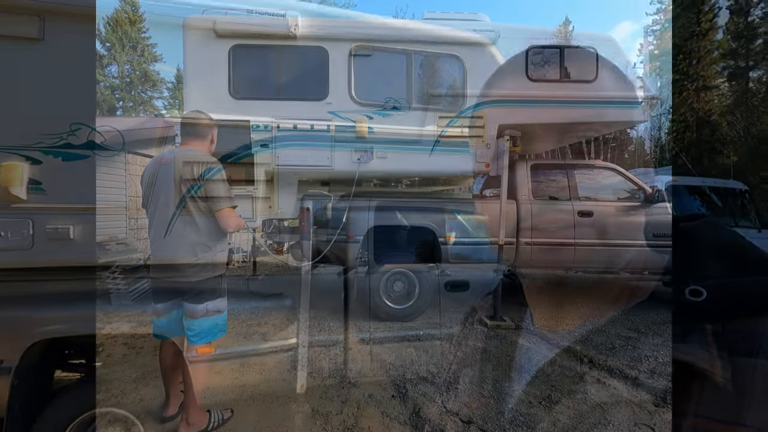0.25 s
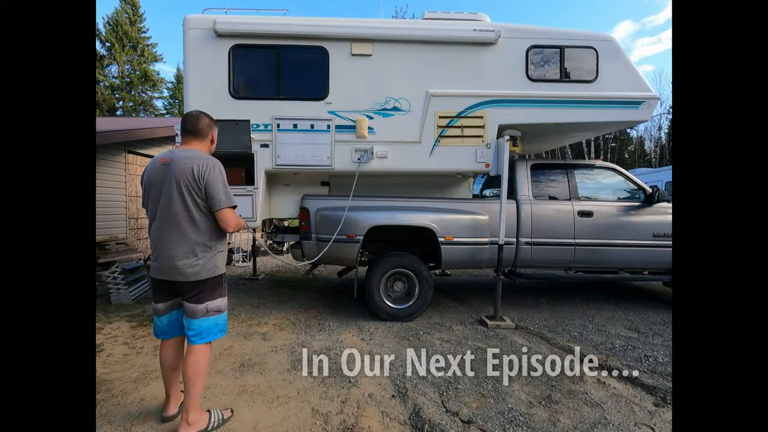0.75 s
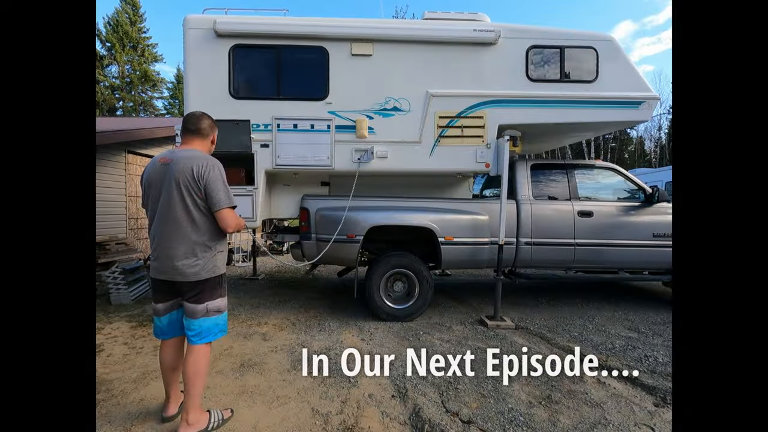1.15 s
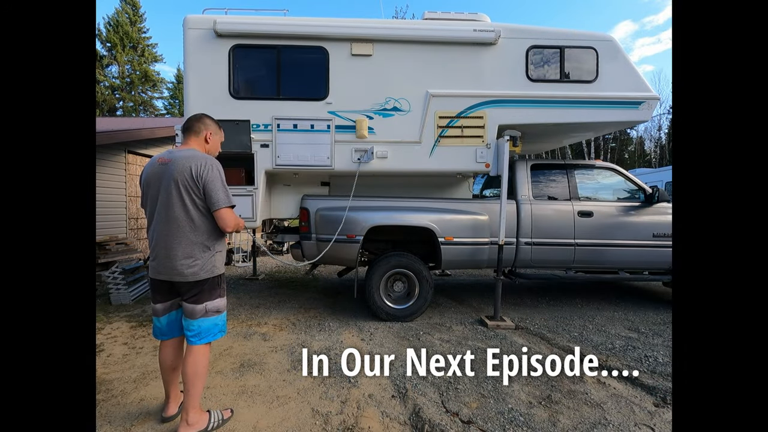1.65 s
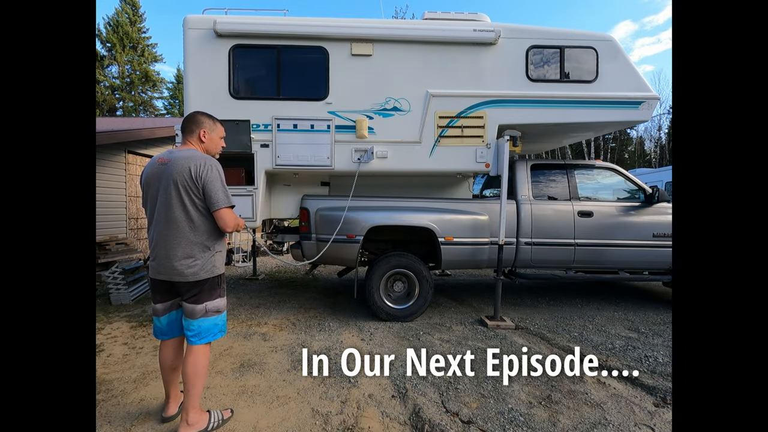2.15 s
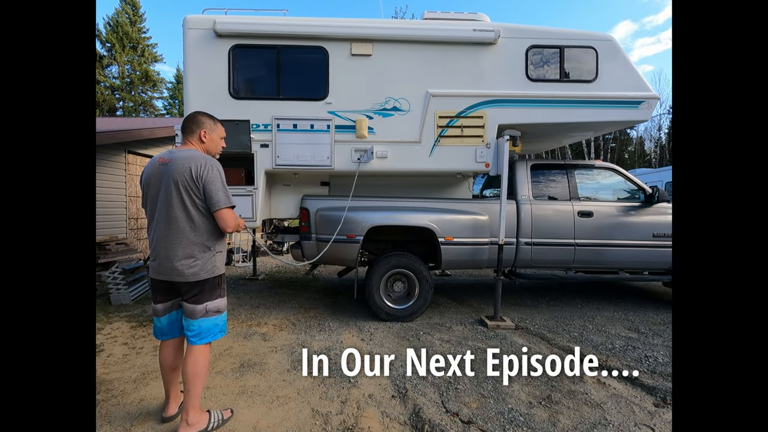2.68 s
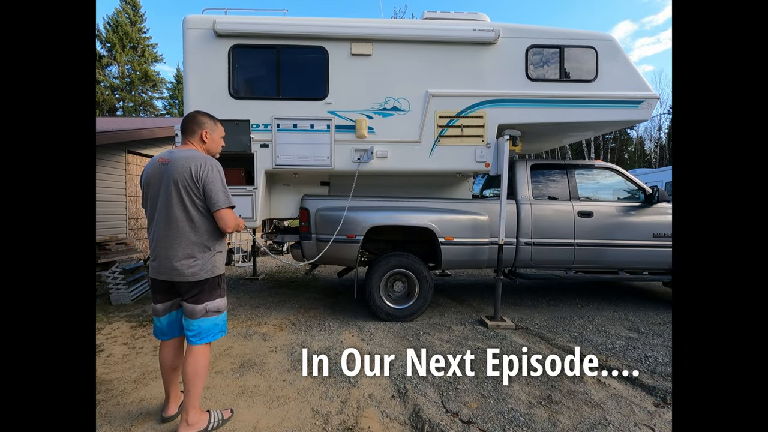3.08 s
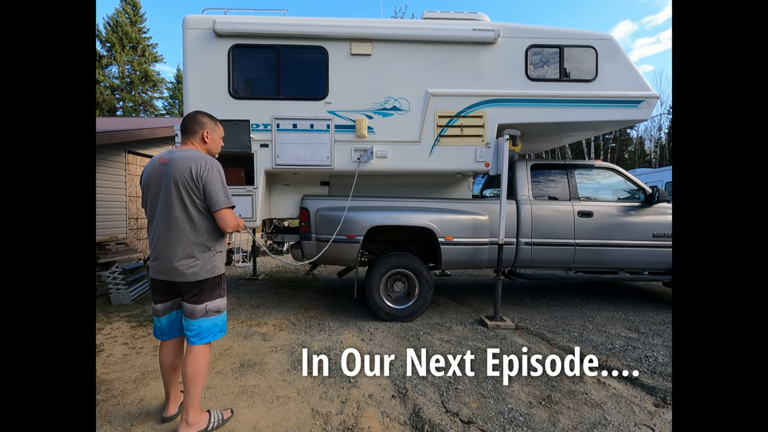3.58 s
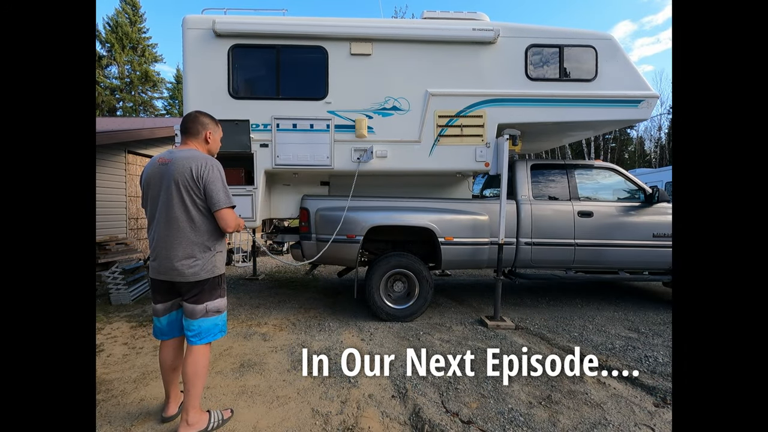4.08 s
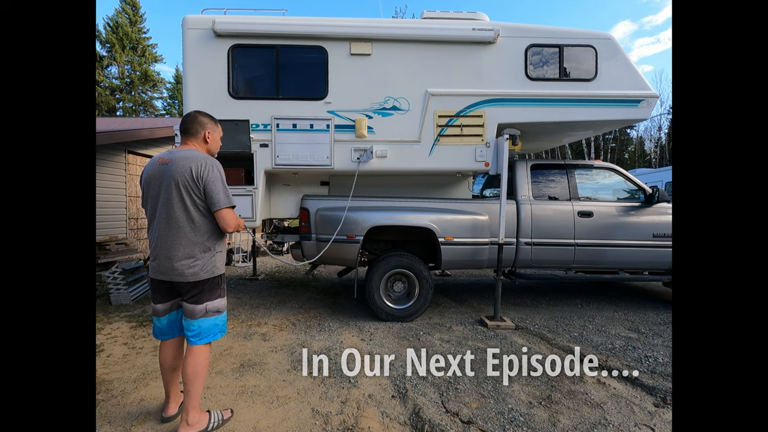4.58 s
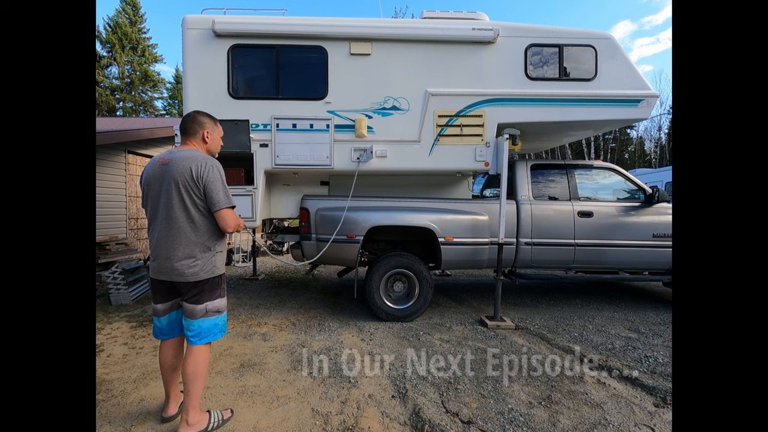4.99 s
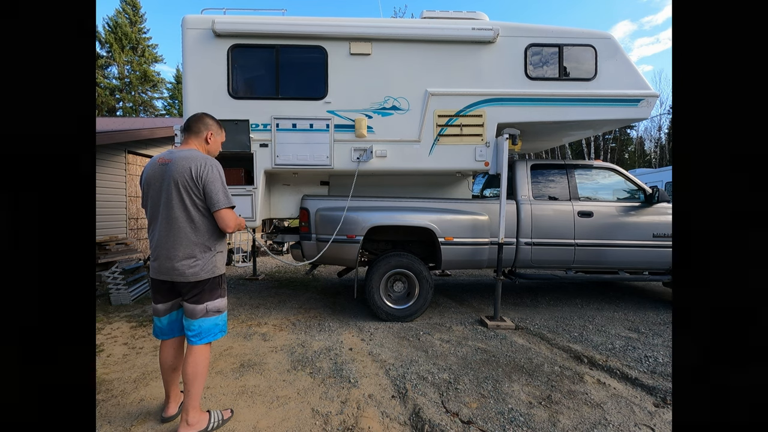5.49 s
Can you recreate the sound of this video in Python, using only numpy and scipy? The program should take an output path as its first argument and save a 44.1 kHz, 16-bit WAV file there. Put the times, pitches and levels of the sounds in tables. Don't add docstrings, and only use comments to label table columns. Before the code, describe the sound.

A quiet outdoor yard with low distant air, faint traffic-like rumble and a brief leaf stir at the start. At about 0.15 s a dry double switch click sounds, and a faint motor noise rises before cutting in fully near 0.28 s: a rough, resonant, buzzing electric gear motor. It drops out around 1.02 s with hollow knocks and a very short low run-down to 1.14 s. Soft wind gusts fill the pause, strongest near 1.2, 1.8 and 2.07 s. Around 2.07-2.18 s relay clicks and a clunk accompany a second motor spinning up quickly. It settles into a steady mid-pitched whine near 650 Hz with a higher octave, metallic rattle and fine hiss, throbbing several times a second and wavering slightly. A faint low frame hum swells and fades. At about 5.46 s power cuts; the pitch falls sharply, two solid knocks land near 5.5 s, and short dull echoes fade into yard air.

```python
import sys
import numpy as np
from scipy import signal
from scipy.fft import rfft, irfft
from scipy.io import wavfile
from scipy.ndimage import uniform_filter1d

SR = 44100
rng = np.random.default_rng(int(sys.argv[2]) if len(sys.argv) > 2 else 0)


def log_audio(samples):
    frames = np.atleast_2d(samples).T
    limited = np.clip(frames, -1, 1)
    pcm = np.round(limited * 32767).astype(np.int16)
    wavfile.write(sys.argv[1], SR, pcm)


def level_to_linear(level):
    exponent = np.asarray(level, float) / 20
    return 10 ** exponent


N = 252867
T = np.arange(N) / SR

# f/Hz, level/dB per Hz
YARD_SPECTRUM = [(15, -49), (25, -15), (93, -18.5), (141, -18.5), (176, -7.5), (214, -10), (348, -7.5),
                 (444, -4.5), (567, -5), (924, -14.5), (1540, -16.5), (1660, -18.5), (6660, -41),
                 (8500, -56), (11000, -89), (18700, -120)]
# t/s, width/s, wind lift/dB, leaf lift/dB
GUSTS = [
    (.07, 0.081, 0, 5),
    (1.2, 0.16, 5, 2),
    (1.78, 0.05, 9, 1),
    (2.07, 0.033, 7, 2),
]
YARD_LEVEL_DB, WIND_DB, CALM_DB, RUSTLE_DB = -44, 1, -4, 1
ECHO_T60_S, ECHO_DB = 0.25, -14.5

# start t/s, peak t/s, end t/s, level/dB
HUM_SWELLS = [
    (2.53, 2.9, 3.46, -57),
    (3.5, 3.98, 4.4, -56),
    (4.37, 4.47, 4.62, -62),
    (4.68, 4.85, 5.2, -60),
    (4.9, 5.47, 5.71, -53),
]

# t/s, peak level/dB,
# f/Hz, t60/s, noise share (0-1)
CLICKS = [(.1511, -27.5, 1520, 0.0086, 0.37), (.1511, -34, 3000, .006, 0.34),
          (0.1548, -26, 1630, 0.01, 0.47), (0.1552, -36, 3600, .006, 0.38), (.1705, -40, 500, .01, 0),
          (1.022, -24.5, 583, 0.098, 0.3), (1.056, -36, 700, .12, .3), (1.064, -31.5, 870, 0.14, 0.55),
          (1.092, -31, 500, .11, 0.19), (2.0658, -37.5, 2600, .025, 1), (2.108, -25, 587, 0.23, 0.17),
          (2.094, -61, 11100, 0.008, 1), (2.175, -43, 11000, .05, 0.65), (2.178, -30.5, 6240, 0.034, 1),
          (5.482, -23, 590, 0.065, 0), (5.5, -19.5, 684, 0.086, 0.16), (5.497, -26, 2170, .09, 0.2)]

# order (times shaft rate), level/dB
BUZZ_ORDERS = [(1, -64), (2.6, -59), (4, -57), (5, -53), (7.6, -51), (8, -47), (9, -47), (10, -50),
               (11, -40), (12, -51), (13.8, -51), (15, -49), (19, -54), (21, -52), (22, -47), (23, -52),
               (25, -41), (28, -47), (29, -48), (30, -48), (31, -43), (32, -48), (39, -50), (41, -43),
               (43, -54), (45, -48), (50, -52), (51, -48), (60, -52), (65, -51)]
# f/Hz, level/dB per Hz
BUZZ_BODY = [(24, -55), (40, -32), (288, -15.5), (350, -18), (643, -5.5), (744, -15), (949, -12),
             (1440, -10.5), (2120, -15.5), (2340, -14), (3900, -16.5), (7170, -37.5), (11400, -57),
             (13500, -68)]
# f/Hz, width/Hz, lift/dB
BUZZ_MODES = [(530, 220, 0.5), (1240, 140, 4.5), (1727, 100, 7), (2330, 94, 8), (2525, 47, 15),
              (2840, 120, 7.5), (3380, 80, -12), (3600, 80, -0.5), (4640, 77, 3), (7080, 230, 5.5),
              (2240, 160, 0), (3300, 130, 0.5)]
BUZZ_HZ, BUZZ_SAG_HZ_S, BUZZ_COAST_HZ_S = 58.3, .3, 160
FAINT_FROM_S, FAINT_DB, FAINT_RISE_DB_S = 0.23, -54, 152
LOUD_FROM_S, BUZZ_OFF_S, BUZZ_STOP_S = .283, 1.015, 1.137
BUZZ_DB, BUZZ_LOW_DB = -32.5, -35
BUZZ_DROP_S, BUZZ_DROP_DB_S = 1.0334, 800
BUZZ_TAIL_DB, BUZZ_TAIL_DB_S, BUZZ_LOW_TAIL_DB = -15, 116, -1.5

# order (times shaft rate), level/dB, throb depth at the wheel rate
WHINE_ORDERS = [(2, -61, 0), (3, -64, .2), (3.8, -55, 0), (5, -53, 0), (8, -52, -.2), (9, -48, -.2),
                (11, -50, -.2), (12, -50, 0), (15, -52, -.5), (16.2, -52, 0), (22, -54, .4), (25, -51, .3),
                (26, -56, .4), (29, -51, .3), (30, -42.5, .75), (33, -52, .4), (40, -48, .6), (45, -53, .3),
                (50, -57, .3), (60, -61, .3), (87, -64, .3), (95, -60, .3)]
# f/Hz, level/dB per Hz
WHINE_BODY = [(24, -68), (40, -44.5), (405, -24.5), (593, -13.5), (664, -6.5), (850, -24), (1220, -20.5),
              (1330, -12), (1420, -20), (2000, -15.5), (4900, -25.5), (6140, -23.5), (8600, -49),
              (11200, -106), (18900, -120)]
# f/Hz, width/Hz, lift/dB
WHINE_MODES = [(503, 53, 3.5), (590, 520, 3), (978, 180, 6), (1540, 99, 4), (1942, 104, 1.5),
               (2190, 170, 5), (2720, 290, 2.5), (2928, 127, 6), (3504, 126, 6), (3770, 52, 3.5),
               (6156, 102, 9), (5720, 150, 5.5)]
# f/Hz, level/dB per Hz
TOOTH_HISS = [(3820, -26), (6500, -15.5), (6680, -9.5), (8090, -12), (8960, -18.5), (10900, -10.5),
              (12900, -23.5), (13600, -42)]
# f/Hz, level/dB
MESH_RESPONSE = [(310, -55), (430, -41), (540, -35), (578, -21), (600, -24.5), (639, -21.5), (648, -25),
                 (670, -26.5)]
# f/Hz, level/dB
OCTAVE_RESPONSE = [(500, -52), (625, -29.5), (810, -23.5), (1110, -46.5), (1190, -38), (1260, -37.5),
                   (1305, -40.5), (1338, -32.5)]
# times per screw turn, shaft speed change/Hz, lag/rad
SCREW_DRAG = [(1, .27, .03), (2, .57, .91), (4, .3, -.11)]
TEETH, GEAR_RATIO, GEAR_HIGH_SPOT_S = 10, .1189, 2.742
SCREW_TURN_S, SCREW_MARK_S = 1.705, 3.55
START_S, SPIN_HZ_S, KNEE_S, SETTLE_S = 1.998, 285, 2.17, .09
FULL_HZ, SAG_HZ_S = 65.96, .08
POWER_OFF_S, COAST_S, COAST_HZ_S, CRAWL_HZ = 5.46, 5.468, 320, 38
RATTLE_DB, LOAD_DB_S, FULL_S, RISE_DB_S = -30.5, 0.25, 2.1395, 361
STOP_S, FALL_DB_S, REST_DB, REST_DB_S = 5.512, 516, -15, 97
HISS_DB, HISS_LOAD_DB_S, HISS_SPEED_DB = -31, 0.3, 22
MESH_WEAR_DB_S, MESH_SWELL_DB, MESH_LAG = -0.7, 1.15, 1.48
OCTAVE_SWELL_DB, OCTAVE_LAG = 0.9, 2.9
MESH_OFF_DB_S, OCTAVE_OFF_DB_S = 150, 600


def after(s):
    return np.maximum(T - s, 0)


def before(s):
    return np.maximum(s - T, 0)


def set_rms(x, db):
    return x * level_to_linear(db) / np.sqrt(np.mean(x ** 2))


def band(x, low_hz, high_hz):
    edges = [low_hz, min(high_hz, .45 * SR)]
    return signal.sosfilt(signal.butter(2, edges, "band", fs=SR, output="sos"), x)


def walk(rate):
    k = int(SR / rate)
    steps = np.repeat(rng.standard_normal(N // k + 1), k)
    return 1.3 * uniform_filter1d(uniform_filter1d(steps, k), k)[:N]


def lift_db(hz, modes):
    return sum(db / (1 + (2 * (hz - f) / w) ** 2) for f, w, db in modes)


def colour(x, spectrum, modes=()):
    size = 8192
    hz = np.maximum(np.arange(size // 2 + 1) * SR / size, 1)
    f, db = np.transpose(spectrum)
    gain_db = np.interp(np.log(hz), np.log(f), db) + lift_db(hz, modes)
    cepstrum = irfft(gain_db * np.log(10) / 20)
    cepstrum[1:size // 2] *= 2
    cepstrum[size // 2 + 1:] = 0
    return signal.fftconvolve(x, irfft(np.exp(rfft(cepstrum))))[:N]


def passed_db(hz, response):
    f, db = np.transpose(response)
    return np.interp(np.log(hz), np.log(f), db)


def yard():
    db = YARD_LEVEL_DB - 35 * before(0.11)
    gusts = sum(np.outer(lift, np.exp(-((T - s) / width) ** 2)) for s, width, *lift in GUSTS)
    wind_db = np.where(T < LOUD_FROM_S, CALM_DB, WIND_DB) + gusts[0]
    rustle_db = RUSTLE_DB + gusts[1]
    flicker = level_to_linear(.8 * walk(14))
    air = set_rms(colour(rng.standard_normal(N) * flicker, YARD_SPECTRUM), -7)
    wind = band(air, 15, 230) * (level_to_linear(wind_db + 1.5 * walk(7)) - 1)
    rustle = band(air, 900, 12000) * (level_to_linear(rustle_db) - 1)
    return (air + wind + rustle) * level_to_linear(db)


def frame():
    hz = np.where(T < COAST_S, whine_hz(), FULL_HZ + 1)
    size = sum(level_to_linear(db) * np.sin(np.interp(T, [start, peak, end], [0, np.pi / 2, np.pi]))
               for start, peak, end, db in HUM_SWELLS)
    return np.sqrt(2) * size * np.sin(2 * np.pi * np.cumsum(hz) / SR)


def clicks():
    out, t = np.zeros(N), T[:4096]
    for s, db, hz, t60, share in CLICKS:
        burst = set_rms(band(rng.standard_normal(len(t)), 0.5 * hz, 1.1 * hz), -1)
        ring = (1 - share) * np.sin(2 * np.pi * hz * t) + share * burst
        onset = np.minimum(t / (.5 / hz), 1)
        i = int(s * SR)
        out[i:i + len(t)] += level_to_linear(db) * ring * np.exp(-np.log(1000) * t / t60) * onset
    return out


def shaft_line(order, shaft_hz, turn, modes, flutter_db, slip, rate):
    grid = np.linspace(0, shaft_hz.max(), 500)
    lift = 0 * grid + lift_db(order * grid, modes)
    passing_db = np.interp(shaft_hz, grid, lift) - lift_db(order * grid[-1], modes)
    phase = order * turn + slip * walk(rate) + 2 * np.pi * rng.random()
    return np.sqrt(2) * level_to_linear(passing_db + flutter_db * walk(rate)) * np.sin(phase)


def grit(turn, beats, scatter_db, repeat):
    gate = sum(db * np.cos(order * turn) for order, db in beats)
    size = np.minimum(rng.exponential(size=N), 5)
    flaws = np.diff(rng.standard_normal(641))
    alike = flaws[(turn / (2 * np.pi) % 1 * len(flaws)).astype(int)]
    repeat = np.clip(repeat, 0, 1)
    loose = rng.standard_normal(N) * level_to_linear(scatter_db * (size - 0.5))
    return (np.sqrt(1 - repeat) * loose + np.sqrt(repeat) * alike) * level_to_linear(gate)


def buzz_db(hold_db, tail_db):
    faint = FAINT_DB - FAINT_RISE_DB_S * before(FAINT_FROM_S)
    off_s = after(BUZZ_DROP_S)
    coast = np.maximum(-BUZZ_DROP_DB_S * off_s, tail_db - BUZZ_TAIL_DB_S * off_s)
    return np.where(T < LOUD_FROM_S, faint, hold_db + coast - 900 * after(BUZZ_STOP_S))


def buzz():
    run_down_hz = np.minimum(BUZZ_COAST_HZ_S * after(BUZZ_OFF_S), 22)
    shaft_hz = BUZZ_HZ - BUZZ_SAG_HZ_S * after(LOUD_FROM_S) - run_down_hz
    turn = 2 * np.pi * np.cumsum(shaft_hz) / SR
    high_db = buzz_db(BUZZ_DB, BUZZ_TAIL_DB)
    low_db = buzz_db(BUZZ_LOW_DB, BUZZ_LOW_TAIL_DB)
    lines = sum(level_to_linear(db) * shaft_line(order, shaft_hz, turn, BUZZ_MODES, flutter_db=1.3, slip=.15, rate=9)
                for order, db in BUZZ_ORDERS)
    lines = lines * level_to_linear(33.0 + 60 * np.log10(shaft_hz / shaft_hz.max()))
    beats = [(1, 0.29), (5, 1.8), (9, 0.59), (10, .6)]  # (shaft order, dB)
    rattle = colour(grit(turn, beats, scatter_db=1.5, repeat=0.45), BUZZ_BODY, BUZZ_MODES)
    sound = np.array([lines, set_rms(rattle, -0.6)])
    low = signal.sosfiltfilt(signal.butter(2, 950, fs=SR, output="sos"), sound)
    return low * level_to_linear(low_db + 2.0) + (sound - low) * level_to_linear(high_db)


def screw():
    return 2 * np.pi * (T - SCREW_MARK_S) / SCREW_TURN_S


def whine_hz():
    drag = sum(hz * np.cos(k * screw() - lag) for k, hz, lag in SCREW_DRAG)
    run = FULL_HZ - SAG_HZ_S * (T - SCREW_MARK_S) + drag
    short = (run - SPIN_HZ_S * (KNEE_S - START_S)) * np.exp(-after(KNEE_S) / SETTLE_S)
    up = np.maximum(np.where(T < KNEE_S, SPIN_HZ_S * (T - START_S), run - short), 10)
    return np.where(T < COAST_S, up, np.maximum(up - COAST_HZ_S * after(COAST_S), CRAWL_HZ))


def whine_db(shaft_hz):
    fall = np.maximum(-FALL_DB_S * after(STOP_S), REST_DB - REST_DB_S * after(STOP_S))
    load_s = T - SCREW_MARK_S
    rattle = RATTLE_DB + LOAD_DB_S * load_s - RISE_DB_S * before(FULL_S) + fall
    hiss = rattle + HISS_DB + HISS_LOAD_DB_S * load_s + HISS_SPEED_DB * np.log10(shaft_hz / FULL_HZ)
    still = -RISE_DB_S * before(FULL_S - .04)
    off_s = after(POWER_OFF_S)
    mesh = passed_db(TEETH * shaft_hz, MESH_RESPONSE) + still - MESH_OFF_DB_S * off_s
    mesh = mesh + MESH_WEAR_DB_S * load_s + MESH_SWELL_DB * np.cos(4 * screw() - MESH_LAG)
    octave = passed_db(2 * TEETH * shaft_hz, OCTAVE_RESPONSE) + still - OCTAVE_OFF_DB_S * off_s
    octave = octave + OCTAVE_SWELL_DB * np.cos(2 * screw() - OCTAVE_LAG)
    octave = octave + 2.2 * walk(70) * (T < KNEE_S + SETTLE_S)
    return rattle, mesh, octave, hiss


def whine_tones(shaft_hz, turn, wheel, bright_db, rattle_db, mesh_db, octave_db):
    throb = 1 + 0.024 * np.cos(2 * wheel + 1.18) + 0.19 * np.cos(3 * wheel + 0.4)
    mesh = shaft_line(TEETH, shaft_hz, turn, (), flutter_db=0.34, slip=0.066, rate=49)
    tones = level_to_linear(mesh_db) * throb * mesh
    throb = 1 + 0.58 * np.cos(wheel - .55) + 0.22 * np.cos(2 * wheel - 2.8)
    octave = shaft_line(2 * TEETH, shaft_hz, turn, (), flutter_db=0.9, slip=0.069, rate=9.8)
    tones = tones + level_to_linear(octave_db) * throb * octave
    pull_db = 5 * np.clip((64.3 - shaft_hz) / 2.5, 0, 1) * (T < POWER_OFF_S)
    for order, db, depth in WHINE_ORDERS:
        line = shaft_line(order, shaft_hz, turn, WHINE_MODES, flutter_db=0.7, slip=0.29, rate=16)
        effort_db = pull_db * order / 30 if order in (30, 40) else bright_db * order / 60
        load_db = rattle_db + 31 + effort_db
        tones = tones + level_to_linear(db + load_db) * (1 + depth * np.cos(wheel - .3)) * line
    return tones


def whine():
    shaft_hz = whine_hz()
    turn = 2 * np.pi * np.cumsum(shaft_hz) / SR
    wheel = GEAR_RATIO * (turn - np.interp(GEAR_HIGH_SPOT_S, T, turn))
    rattle_db, mesh_db, octave_db, hiss_db = whine_db(shaft_hz)
    bright_db = 45 * np.log10(shaft_hz / shaft_hz.max())
    tones = whine_tones(shaft_hz, turn, wheel, bright_db, rattle_db, mesh_db, octave_db)
    beats = [(1, 0.37), (5, 1.0), (10, 0.46)]  # (shaft order, dB)
    swell_db = 0.28 * np.cos(wheel) + 0.49 * np.cos(2 * wheel + .3) + 0.46 * walk(12)
    impacts = grit(turn, beats, scatter_db=2.0, repeat=0.13) * level_to_linear(swell_db)
    rattle = set_rms(colour(impacts, WHINE_BODY, WHINE_MODES), 1.99)
    rub_db = 4.1 * np.cos(wheel) + 1.3 * np.cos(2 * wheel + .5) + 1.3 * walk(45)
    rattle = rattle + band(rattle, 2630, 14000) * (level_to_linear(bright_db + 0.13 * rub_db) - 1)
    hiss = colour(grit(turn, beats, scatter_db=2.0, repeat=0.041) * level_to_linear(rub_db), TOOTH_HISS)
    return np.array([tones, level_to_linear(rattle_db) * rattle + level_to_linear(hiss_db) * set_rms(hiss, 5.5)])


def scene():
    tones, rattle = buzz() + whine()
    near = rattle + clicks()
    t = T[:SR // 2]
    tail = rng.standard_normal(len(t)) * np.exp(-np.log(1000) * t / ECHO_T60_S) * (t > .008)
    tail = band(tail, 360, 3140)
    tail = tail / np.sqrt(np.sum(tail ** 2))
    echo = signal.fftconvolve(near + 0.19 * tones, tail)[:N]
    return (near + tones + frame() + level_to_linear(ECHO_DB) * echo + yard())[None]


def band_limit(x):
    return signal.sosfilt(signal.butter(12, 13780, fs=SR, output="sos"), x)


def record(dry):
    mix = signal.sosfilt(signal.butter(2, 42, "high", fs=SR, output="sos"), dry)
    mix = mix + level_to_linear(-82) * rng.standard_normal(dry.shape)
    mix = signal.lfilter(*signal.iirnotch(9000, 12, fs=SR), mix)
    mix = signal.lfilter(*signal.iirnotch(9050, 14, fs=SR), mix)
    return band_limit(mix)


dry = scene()
out = record(dry)
log_audio(out)
```